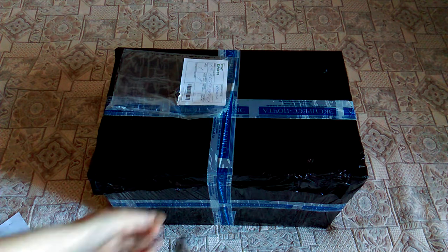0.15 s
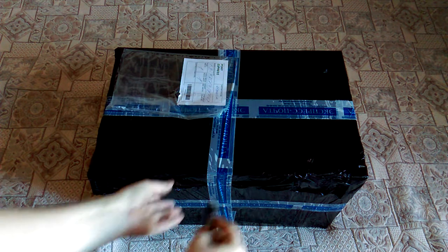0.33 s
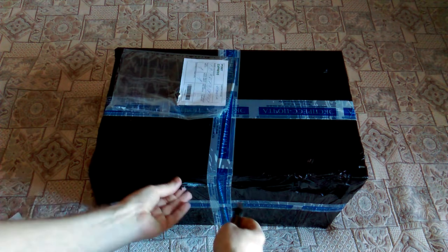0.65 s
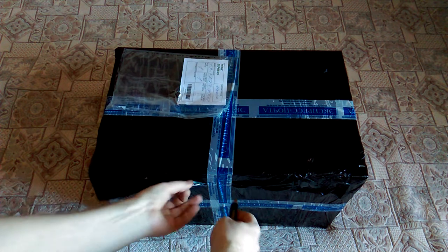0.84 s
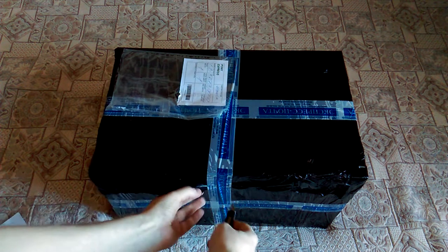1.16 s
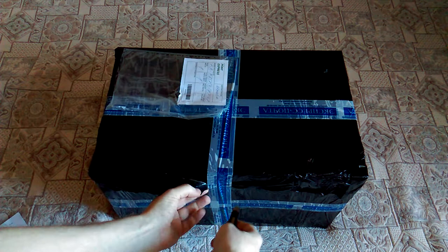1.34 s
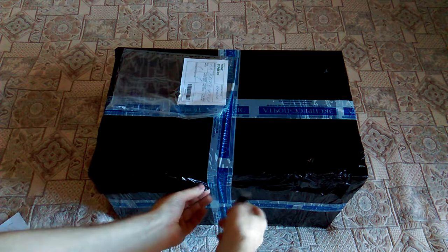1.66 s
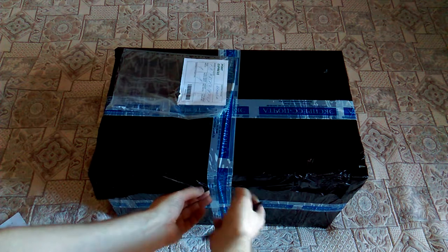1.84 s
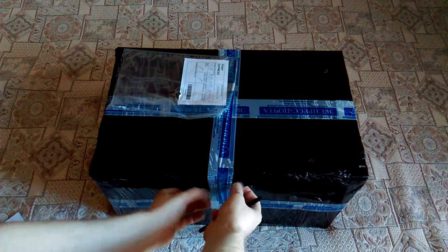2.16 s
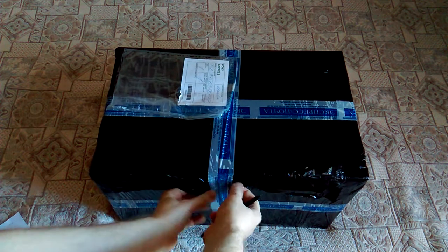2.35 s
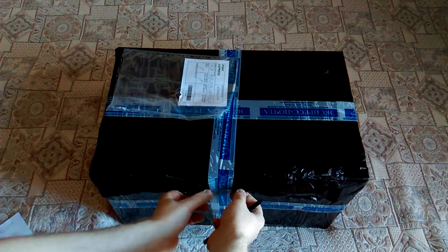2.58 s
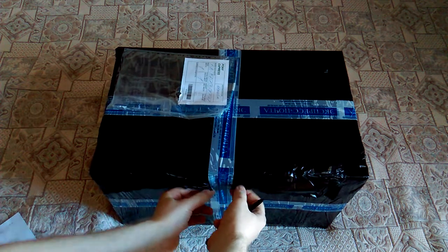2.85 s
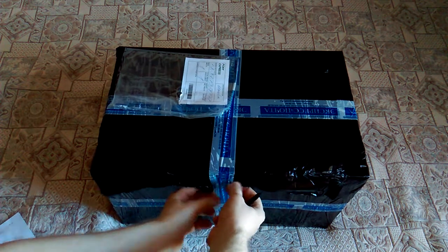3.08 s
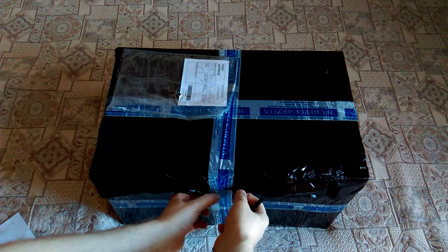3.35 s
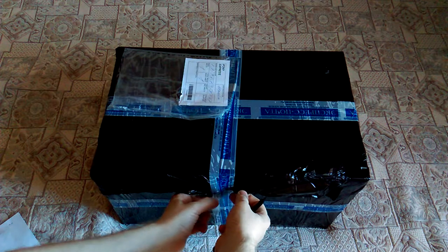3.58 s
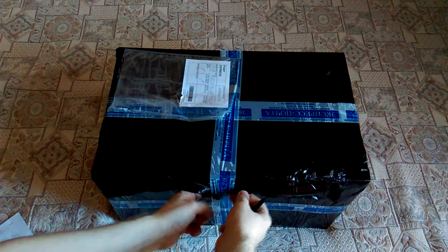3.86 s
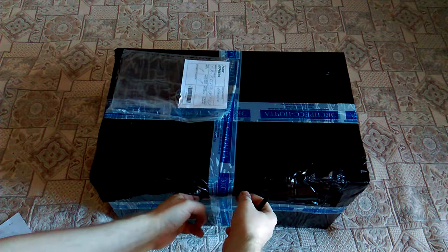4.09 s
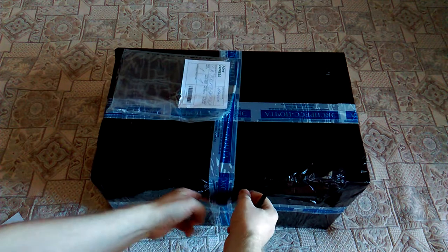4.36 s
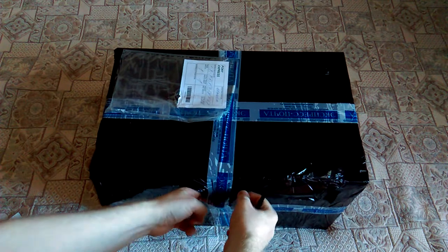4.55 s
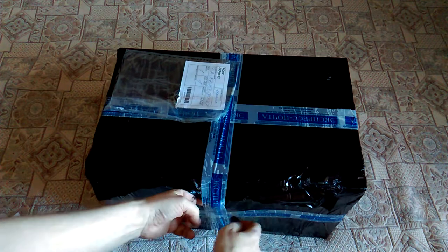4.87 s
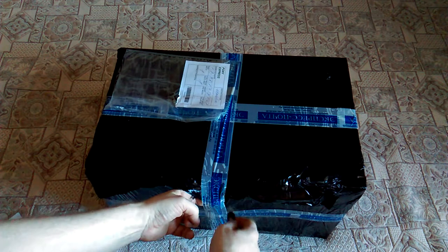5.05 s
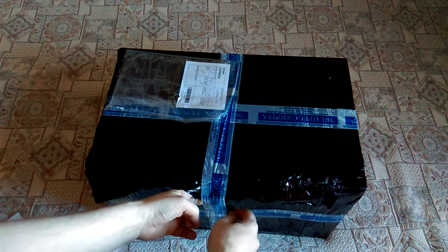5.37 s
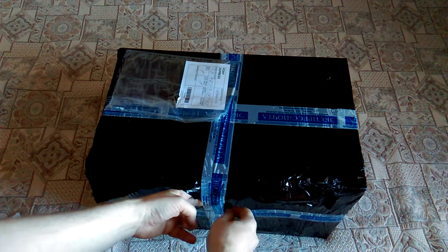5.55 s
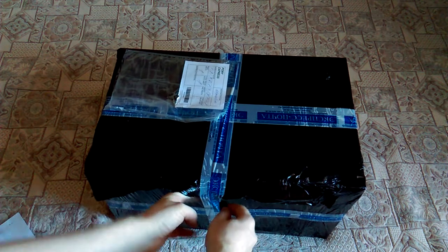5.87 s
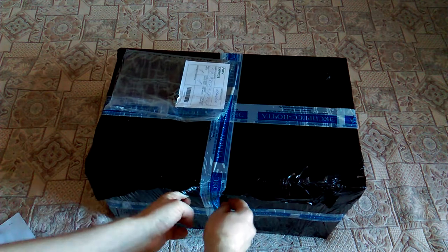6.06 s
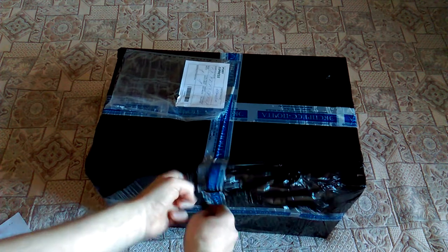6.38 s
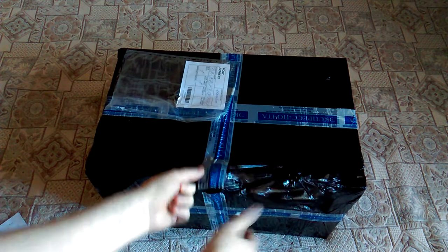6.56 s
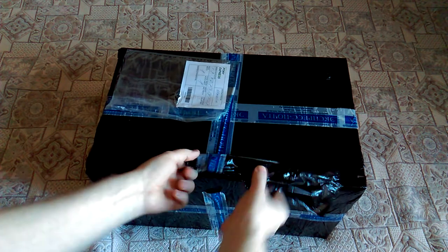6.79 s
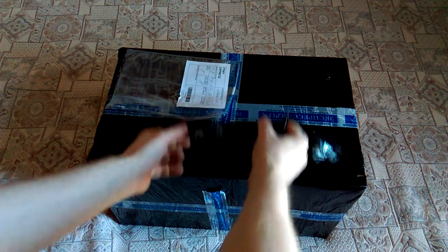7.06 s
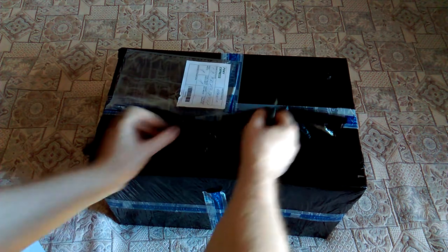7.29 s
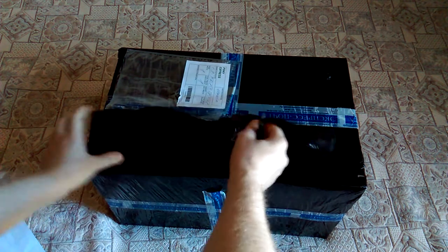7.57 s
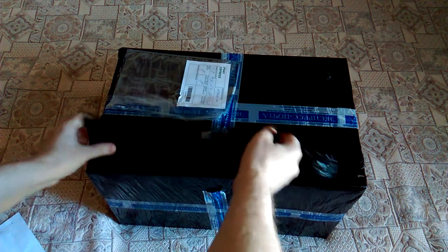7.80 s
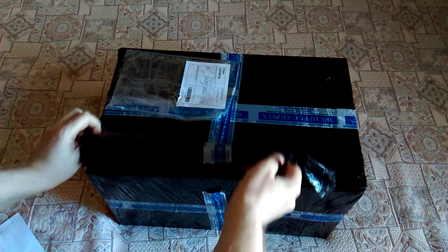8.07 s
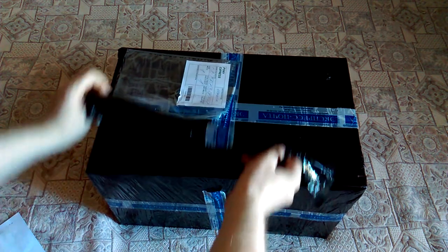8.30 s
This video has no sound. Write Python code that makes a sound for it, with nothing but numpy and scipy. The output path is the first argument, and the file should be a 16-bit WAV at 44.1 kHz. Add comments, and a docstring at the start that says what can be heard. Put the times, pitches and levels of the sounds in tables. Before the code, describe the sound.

Close stereo pickup of a parcel being opened indoors. Small plastic clicks and a brief squeak come first, then dense, bright, irregular snaps and tearing with boxy low knocks, strongest in the middle. The action thins out, bursts again with a couple of big rips, then ends in squeaky, crumpling film handling over low hush, distant traffic rumble and a far motor revving briefly.

```python
"""A small quiet room, where hands pick at, stretch and tear plastic film and tape on a cardboard box.
Shaped noise makes the film: popping creases rustle, gliding bands squeak, short cracks and rips snap.
Resonators make the box boom under jerks and presses; echoes and a short tail answer from floor and walls.
Behind lie hush, far traffic, one revving engine and faint tones. Two close microphone ports hear the
bass of the handling in opposite phase."""
import sys
import numpy as np
from scipy import signal
from scipy.fft import rfft, irfft, next_fast_len
from scipy.io import wavfile
from scipy.ndimage import uniform_filter1d

SR = 44100
rng = np.random.default_rng(int(sys.argv[2]) if len(sys.argv) > 2 else 0)


def persist_wave(psi):
    """Save psi, clipped to +-1, as 16-bit WAV."""
    counts = np.round(np.clip(psi, -1, 1) * 32767).astype(np.int16)
    wavfile.write(sys.argv[1], SR, np.atleast_2d(counts).T)


N = 371763
SIZE = next_fast_len(N + SR)  # transform length with room for tails
HZ, T = np.fft.rfftfreq(SIZE, 1 / SR), np.arange(N) / SR


def amp(db):
    """Decibels to a linear gain."""
    return 10 ** (np.asarray(db) / 20)


def evened(x):
    """Scales a signal to an RMS of 1."""
    return x / np.sqrt(np.mean(x ** 2) + 1e-20)


def read(points, hz=HZ):
    """Reads a curve of (frequency, value) points along a log frequency axis."""
    f, value = np.transpose(points)
    return np.interp(np.log(hz + 1), np.log(f + 1), value)


def follow(rows):
    """Draws each column of a timed curve, sample by sample."""
    s, *columns = np.transpose(rows)
    return [np.interp(T, s, c) for c in columns]


def coloured(x, gain):
    """Filters by a gain over HZ, scaled so that white noise keeps its level."""
    even_gain = gain / np.sqrt(np.mean(abs(gain) ** 2))
    return irfft(rfft(x, SIZE) * even_gain, SIZE)[..., :N]


def below(hz):
    """Gain of a steep low-pass."""
    return 1 / np.sqrt(1 + (HZ / hz) ** 8)


def above(hz):
    """Gain of the high-pass that complements below() in power."""
    return np.sqrt(1 - below(hz) ** 2)


def resonate(x, hz, width):
    """A resonance of gain 1: shifts the curve hz down to zero, smooths, and shifts back."""
    turn = np.exp(2j * np.pi * np.cumsum(hz * np.ones(x.shape[-1])) / SR)
    r = np.exp(-np.pi * width / SR)
    smooth = signal.lfilter([1 - r], [1, -r], x / turn)
    return 2 * (turn * smooth).real


def sides(pan_db):
    """Gains of the rows left, shared and own; a positive pan favours the left port."""
    return amp(np.array([pan_db, -pan_db, -pan_db]) / 2)


def room_hush(noise):
    """Steady room and microphone noise, coloured by its spectrum."""
    # Hush spectrum: frequency_hz, relative density_db [dB per Hz]
    hush_curve = [(25, 3), (70, -7.5), (140, -10.5), (170, -15), (205, -10.5), (235, -17.5), (410, -19),
                  (850, -22.5), (2200, -28.5), (5000, -32), (7500, -30), (16000, -39.5)]
    return amp(-62.5) * coloured(noise, amp(read(hush_curve)) * above(39.2))


def engine():
    """A far engine revs once: sines at multiples of its firing rate rise and fall in pitch."""
    # Rev: time_s, firing_hz, level_db
    rev = [(7.2, 37.9, -74), (7.33, 42.6, -67), (7.45, 48.5, -63), (7.6, 52.2, -60), (7.7, 50.7, -62),
           (7.8, 46.4, -71)]
    # Orders: multiple of the firing rate, level_db added to the rev
    orders = [(1, 4), (2, -1), (3, -11)]
    hz, db = follow(rev)
    turns = np.cumsum(hz) / SR
    out = sum(amp(db + d) * np.sin(2 * np.pi * (k * turns + rng.random())) for k, d in orders)
    return np.sqrt(2) * out * (T > rev[0][0]) * (T < rev[-1][0])


def far_tones():
    """Faint short far tones: noise through a very narrow gliding resonance."""
    # Tones: start_s, end_s, start_hz, end_hz, level_db
    tone_list = [(1.74, 2.133, 882, 887, -71), (5.037, 5.14, 614, 633, -69), (5.346, 5.43, 763, 794, -69),
                 (5.485, 5.55, 765, 720, -71)]
    out = np.zeros(N)
    for start, end, start_hz, end_hz, db in tone_list:
        count = round((end - start) * SR)
        glide_hz = np.linspace(start_hz, end_hz, count)
        tone = resonate(rng.standard_normal(count), glide_hz, 4.9)
        out[round(start * SR):][:count] += amp(db) * evened(tone) * signal.windows.tukey(count, .6)
    return out


def background():
    """Hush, a swelling wash and rumble of far traffic, and far single sounds, mixed as mid and side."""
    # Far traffic: time_s, wash_db and rumble_db [relative, trimmed below]
    street = [(0.0, -65.5, -45.5), (2.13, -61.5, -55.5), (3.69, -72.5, -40.5), (4.25, -58, -50),
              (4.46, -74, -40), (5.19, -78, -61.5), (7.23, -76, -80), (7.42, -84, -55), (8.43, -81, -45)]
    # Width of hush and wash: frequency_hz, extra side gain_db
    side_curve = [(60, 1), (180, 9), (550, 4), (1650, -1.5), (4970, 0.5), (15000, 2)]
    wash_db, rumble_db = follow(street)
    hush_noise, wash_noise, rumble_noise = rng.standard_normal((3, 2, N))
    wash = amp(wash_db - 4.5) * coloured(wash_noise, above(580) * below(1260))
    mid, side = room_hush(hush_noise) + wash
    side = irfft(rfft(side, SIZE) * amp(read(side_curve)), SIZE)[:N]
    rumble = amp(rumble_db - 16.5) * coloured(rumble_noise, above(44) * below(53.5))
    single = engine() + far_tones()
    mid = mid + rumble[0] + single
    side = side + 0.25 * rumble[0] + 0.37 * rumble[1] + 0.24 * single
    return np.array([mid + side, mid - side])


def room(dry):
    """A few near echoes, then sparse taps of random sign whose bands die at their own speed."""
    # Decay: frequency_hz, t60_s
    decay = [(150, 0.27), (500, 0.2), (1500, 0.2), (4000, 0.14), (8000, 0.081), (15000, 0.12)]
    # Echoes of floor, box and near wall: delay_ms, level_db
    echoes = [(4.4, -12.5), (6.2, -20.5), (9.5, -27.5), (12.5, -15)]
    taps = np.zeros((2, SR // 2))
    # one tap at a random place in every slot of 20 samples
    at = np.arange(260, SR // 2 - 20, 20) + rng.integers(0, 20, (2, (SR // 2 - 261) // 20))
    np.put_along_axis(taps, at, rng.choice([-1., 1.], at.shape), 1)
    hz, t, bands = signal.stft(taps, SR, nperseg=256)
    fading = bands * amp(-60 * t / read(decay, hz)[:, None])
    tail = signal.istft(fading, SR, nperseg=256)[1]
    tail *= 1 - np.exp(-np.arange(tail.shape[1]) / SR / .012)  # the diffuse sound builds up
    tail *= amp(-6.5) / np.linalg.norm(tail[0])
    tail[:, 0] = 0  # the direct sound is mixed in by scene()
    for ms, db in echoes:
        tail[:, round(ms * SR / 1000)] += amp(db)
    sent = (dry[[0, 2]] + dry[1]) / 2
    left, own = signal.fftconvolve(sent, tail, axes=1)[:, :N]
    return np.array([left, left, own])


def box(x):
    """The cardboard panels ring: a sum of resonances above the lowest bass."""
    # Panel modes: frequency_hz, width_hz, relative level_db
    panels = [(134, 32, 8), (229, 28, 11.5), (362, 62, 15), (555, 77, 11.5), (823, 32, 0.5),
              (1280, 870, -5.5)]
    ring = sum(amp(db) / (1 + 2j * (HZ - hz) / width) for hz, width, db in panels)
    return coloured(x, ring * above(110))


def film(top, body):
    """The film radiates its crackle in the treble and its larger folds lower down."""
    # Film spectrum: frequency_hz, relative density_db [dB per Hz]
    sheen = [(400, -22), (800, -18.5), (1300, -19.5), (2000, -15), (4100, -9.5), (5800, -4), (7500, 5),
             (9000, 1), (13500, -3), (16000, -7)]
    colour = amp(read(sheen))
    return coloured(top, colour * above(4200)) + coloured(body, colour * below(4010))


def creases(per_s, spread_db, ms):
    """Loudness of crackling film: clumped creases of widely spread size, and the clumps themselves."""
    clumps = amp(2.17 * evened(uniform_filter1d(rng.standard_normal(N), 500)))
    size = amp(spread_db * np.minimum(rng.exponential(1, N), 3))
    pops = size * (rng.random(N) < per_s * clumps / SR)
    fade = np.exp(-T[:400] * 1000 / ms)
    return evened(signal.oaconvolve(pops, fade)[:N]), clumps


def squeaks():
    """Stretched film slips and zips: noise in a band that glides, mostly up, and widens as it glides."""
    # Slips: start_s, length_s, start_hz, end_hz, level_db
    slips = [(0.889, .07, 4950, 12200, -35), (7.121, .04, 5400, 7740, -31.5),
             (7.212, .018, 7400, 7270, -30.5), (7.23, 0.025, 7400, 7940, -37.5)]
    glide_share = 0.33  # part of the length spent gliding
    start_wide, end_wide = 0.029, 0.53  # power share of wide noise at the start and after the glide
    out = np.zeros((3, N))
    for start, length, start_hz, end_hz, db in slips:
        u = np.linspace(0, 1, round(length * SR))
        glide = np.clip(u / glide_share, 0, 1)
        hz = start_hz + (end_hz - start_hz) * glide
        noise = rng.standard_normal((2, 2, len(u)))
        narrow, wide = (
            [evened(resonate(resonate(n, hz, width_hz), hz, width_hz)) for n in pair]
            for pair, width_hz in zip(noise, (700, 4500)))
        share = np.clip(start_wide + (end_wide - start_wide) * glide ** 3, 0, 1)
        a, b = np.sqrt(1 - share) * narrow + np.sqrt(share) * wide
        swell = np.sin(np.pi * u ** 0.47) ** 0.45
        out[:, round(start * SR):][:, :len(u)] += np.array([a, a, b]) * amp(db) * swell
    return out


def rustle():
    """Creases pop over a fine hiss of sliding film; crumples also press on the box."""
    # Hand crumples or pulls: start_s, hold_s, rustle level_db, body_db [lower folds re rustle]
    crumples = [(0.443, .1, -65.5, -6), (0.578, 0.047, -52.5, -6.5), (0.672, 0.031, -48.5, -2.5),
                (0.815, .04, -53, -14), (0.87, 0.036, -42.5, -30), (1.06, .02, -63, -11),
                (1.114, 0.021, -50.5, -8), (1.246, 0.028, -54.5, -7), (1.32, 0.052, -65.5, 2),
                (1.469, 0.016, -60.5, 6), (1.674, 0.022, -59.5, -3), (1.752, 0.031, -48.5, -13.5),
                (1.922, 0.15, -58.5, -10), (2.05, .05, -56, -14), (2.134, 0.38, -47.5, -8.5),
                (2.404, 0.11, -52.5, -3), (2.681, 0.043, -49.5, -9.5), (2.823, 0.1, -50.5, -2.5),
                (3.061, 0.28, -47, -5), (3.404, 0.17, -56, 0), (3.613, 0.042, -52, -6),
                (3.714, 0.14, -46.5, -9), (3.96, 0.056, -48.5, -2), (4.068, 0.039, -45.5, -6),
                (4.232, 0.11, -46.5, -4), (4.412, 0.028, -36, -2), (4.585, 0.01, -40, 3),
                (4.712, 0.054, -45.5, -11), (4.814, 0.02, -46, 0.5), (4.93, 0.76, -61, -8.5),
                (5.4, 0.011, -48.5, -9), (5.684, 0.058, -44, -3), (5.827, 0.035, -42.5, 5.5),
                (6.018, 0.14, -66, -4), (6.145, .04, -58, -8), (6.197, 0.11, -45.5, 5.5),
                (6.47, .13, -63, -8), (6.854, .02, -46.5, -2.5), (6.948, 0.075, -47, -4),
                (7.022, 0.032, -40, -8.5), (7.115, 0.068, -46.5, -3.5), (7.229, .03, -46.5, -5),
                (7.335, 0.26, -59, -9), (7.697, 0.011, -54, 0), (7.781, .11, -49, -3.5),
                (7.916, 0.026, -44.5, -2.5), (8.063, 0.08, -50, -9.5), (8.186, 0.096, -54, -5.5),
                (8.365, 0.025, -49, 3)]
    grip_db_per_s, settle_db_per_s = 515, 198  # swells quickly, settles slowly
    start, hold, db, body_db = np.transpose(crumples)[..., None]
    t = T[::64]  # a coarse clock is enough for the swells
    swell_db = np.maximum(grip_db_per_s * (start - t), 0)
    fall_db = np.maximum(settle_db_per_s * (t - start - hold), 0)
    shape = amp(db - swell_db - fall_db)
    # body counts twice in the press: fuller crumples press harder
    level, body, press = (
        np.interp(T, t, np.linalg.norm(shape * amp(k * body_db), axis=0)) for k in (0, 1, 2))
    pops, clumps = creases(per_s=500, spread_db=4.8, ms=.45)
    loudness = amp(-8.5) * pops + amp(-7.0) * clumps ** 1.8  # pops and hiss
    a, b = rng.standard_normal((2, N)) * loudness
    grains = np.array([a, a, b])
    # the wrapped box face rings under the crumpling
    folds = grains * body + 0.89 * resonate(grains * body, 1670, 180)
    return film(grains * level, folds) + amp(-13) * box(grains * press)


def snaps():
    """Film or tape lets go: a sharp crack and splinters; the seam rips on; the jerk drums the box."""
    # Releases: start_s, level_db, body_db [under about 4 kHz, relative], flap ring_hz
    releases = [(0.5263, -43, -17, 6500), (0.5484, -42, -22, 5060), (0.6015, -30, -18, 5800),
                (0.6492, -36, -25, 5440), (0.6639, -20, -22, 5900), (0.7337, -30, -15, 1310),
                (0.782, -29, -16, 1310), (0.8101, -25.5, -18, 1280), (0.843, -31.5, -8.5, 6180),
                (1.022, -31, -14.5, 3900), (1.043, -27, -18, 1310), (1.089, -33, -12.5, 3100),
                (1.1127, -26, -22, 2970), (1.1737, -25, -13.5, 3250), (1.192, -30, -20, 2370),
                (1.2224, -27.5, -22, 2840), (1.2498, -36.5, -10.5, 5850), (1.3106, -25, -29, 6800),
                (1.3290, -38, -18, 7000), (1.4802, -24.5, -16.5, 6180), (1.557, -28, -9.5, 5900),
                (1.586, -36.5, -23, 6500), (1.6531, -28.5, -15, 1300), (1.8476, -38.5, -11.5, 1380),
                (1.895, -20, -30, 4440), (1.9602, -30, -17, 5230), (1.9861, -24.5, -28, 1560),
                (2.1374, -22, -16.5, 5660), (2.196, -30.5, -22, 7000), (2.2317, -24, -14, 3400),
                (2.2617, -18, -19.5, 5070), (2.2906, -24, -9.5, 3630), (2.314, -30, -7, 3600),
                (2.3271, -6, -12.5, 2420), (2.4042, -23.5, -14, 1720), (2.4385, -24.5, -27, 5950),
                (2.4626, -24, -16.5, 2240), (2.5173, -30, -15.5, 3830), (2.538, -29, -20, 4995),
                (2.584, -31.5, -6.5, 2706), (2.6883, -30, -8.5, 3400), (2.7766, -11, -11.5, 3170),
                (2.8455, -22, -20, 6030), (2.896, -27, -36, 1570), (3.0827, -10.5, -11, 4230),
                (3.1197, -21.5, -8.5, 5450), (3.1504, -3.5, -18, 4860), (3.2127, -5.5, -13.5, 2140),
                (3.264, -8, -6.5, 1170), (3.438, -34, -5, 2500), (3.527, -28, -12, 2900),
                (3.678, -31, -1, 4500), (3.686, -8, -9.5, 5030), (3.8847, -11, -6.5, 3560),
                (4.06, -27, -12.5, 3010), (4.1343, -12.5, -3.5, 2330), (4.1845, -15, -5.5, 2240),
                (4.376, -20, -29, 1890), (4.3996, -3, -11.5, 1680), (4.5232, -2, -12, 1750),
                (4.6175, -14, -15, 1280), (4.7568, -37, -8, 5760), (4.8173, -27, -2.5, 1500),
                (4.855, -27.5, -20, 1360), (4.9463, -35, -5.5, 1520), (5.185, -33, -13, 1310),
                (5.4086, -24, -22, 2250), (5.6585, -28, -10, 1410), (5.896, -24, -13, 1670),
                (5.9448, -27, -28, 2530), (6.139, -27.5, -18, 4540), (6.1734, -23, -15, 3280),
                (6.1902, -8.5, -22, 2650), (6.216, -8, -15.5, 1750), (6.3171, -19, -31, 1680),
                (6.5833, -34, -16.5, 1525), (6.864, -16.5, -21, 1350), (7.014, -30, -10, 5770),
                (7.241, -29, -8, 2700), (7.316, -31.5, -31, 6000), (7.431, -44, -37, 1213),
                (7.6972, -28, -7.5, 2390), (7.933, -27, -8.5, 2920), (8.089, -34, -15, 4970),
                (8.212, -36, -20, 6000), (8.361, -30.5, -10, 5200), (8.397, -27.5, -27, 3000)]
    rip_db, rip_per_db = -20, 0.2  # small snaps are drier
    boom_db, boom_per_body = -14, 0.13  # the box booms more under a snap with more body
    span = 8192  # samples given to each snap
    top, body, boom = np.zeros((3, 3, N + span))
    t = T[:span] * 1000  # ms
    rough = .7 + .7 * creases(per_s=1200, spread_db=4, ms=.5)[0]
    for s, db, body_db, ring_hz in releases:
        a, b, lumps = rng.standard_normal((3, span))
        at = slice(round(s * SR), round(s * SR) + span)
        splinters = amp(0.8 * evened(uniform_filter1d(lumps, size=12)) + 0.5)
        splinters = splinters * np.exp(-(t / 1.76) ** 2) * (1 - np.exp(-t / 0.87))
        crack = np.exp(-((t - .9) / 0.16) ** 2) + splinters
        crack = crack * np.sqrt(22 / ((crack * a) ** 2).sum())  # its energy is set by the pull
        rip = amp(rip_db + rip_per_db * db - 0.28 * t) * (1 - np.exp(-t / 0.8))
        rip = rip * np.resize(rough[at], span)
        pan = sides(1.6 * lumps[0])[:, None]
        noise = np.array([a, a, b]) * pan * amp(db)
        # the freed flap rings as the seam rips
        flap = resonate(noise * (0.25 * crack + rip), ring_hz, 0.26 * ring_hz)
        burst = noise * (crack + rip) + 2.4 * flap
        top[:, at] += amp(-7.0) * burst * sides(-5.0)[:, None]  # the treble favours the right port
        body[:, at] += amp(body_db + 2.5) * burst
        # the heavy box follows the pull more than the crack
        boom[:, at] += amp(boom_db + boom_per_body * body_db) * noise * (0.043 * crack + rip)
    return film(top[:, :N], body[:, :N]) + box(boom[:, :N])


def ports(left, shared, own):
    """The right port hears a signed part of the shared sound, and part of its own, band by band."""
    # Left-right likeness of the handling: frequency_hz, likeness [-1 opposite phase to 1 same]
    likeness = [(60, -0.53), (130, -0.79), (290, -0.96), (640, -0.71), (1410, -0.22), (3100, -0.21),
                (6820, 0.044), (15000, -0.0056)]
    same = np.clip(read(likeness), -1, 1)
    right = same * rfft(shared, SIZE) + np.sqrt(1 - same ** 2) * rfft(own, SIZE)
    return np.array([left, irfft(right, SIZE)[:N]])


def scene():
    """The handling and its room answer at the two ports, over the background."""
    dry = snaps() + rustle() + squeaks()
    return amp(2) * ports(*(dry + room(dry))) + background()


def record(dry):
    """Loud peaks are softly squeezed; then a steep treble cut and the band limit."""
    # Upper limit of the sound: frequency_hz, gain_db
    treble_cut = [(15700, 0.5), (16200, -26.5)]
    edge_hz = 16970
    squeezed = 0.81 * np.tanh(dry / 0.88)
    soft = irfft(rfft(squeezed, SIZE) * amp(read(treble_cut)), SIZE)[:, :N]
    band_limit = signal.firwin(511, edge_hz, window=("kaiser", 9), fs=SR)
    return signal.oaconvolve(soft, band_limit[None], "same")


dry = scene()
out = record(dry)
persist_wave(out)
```